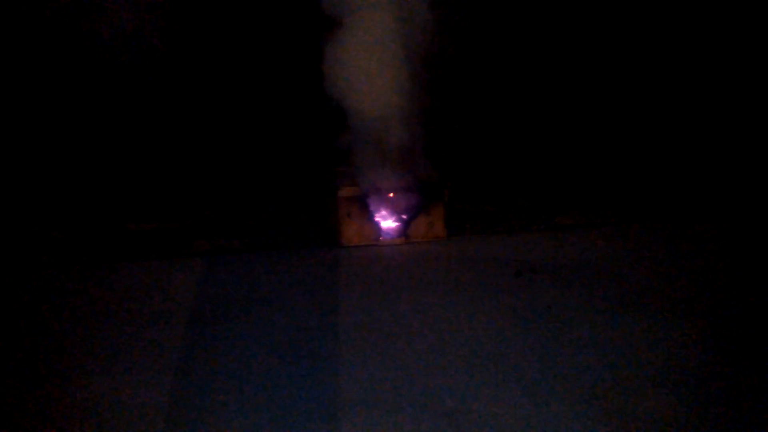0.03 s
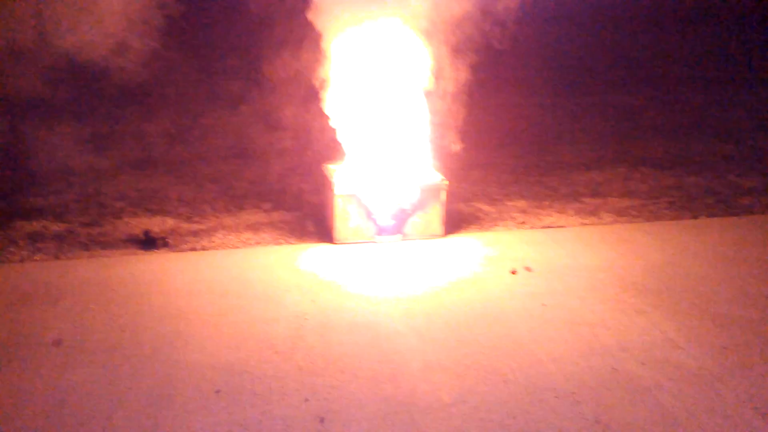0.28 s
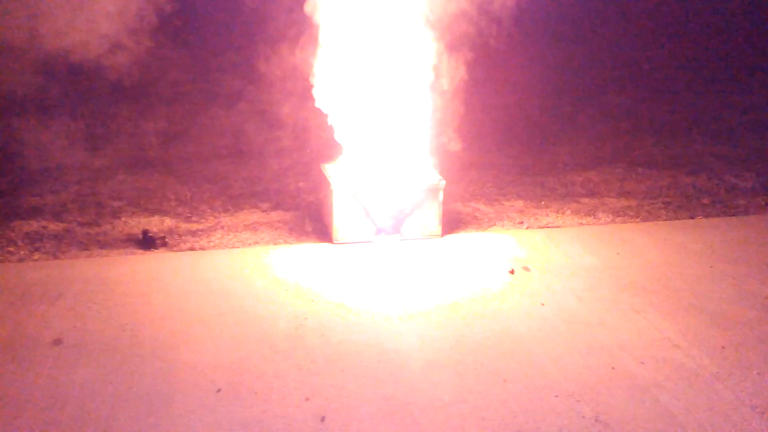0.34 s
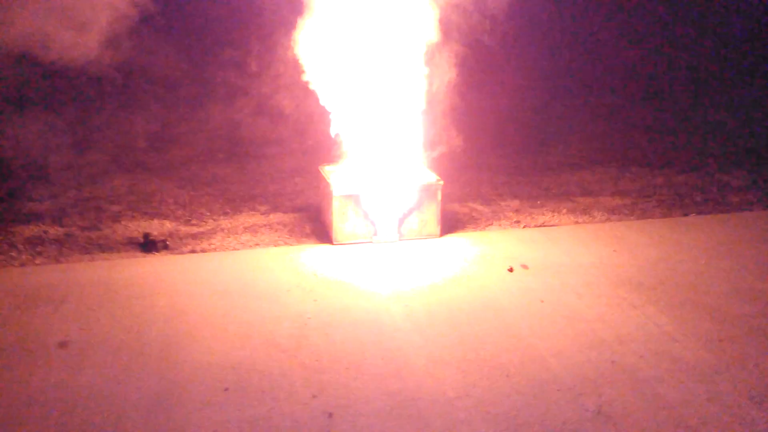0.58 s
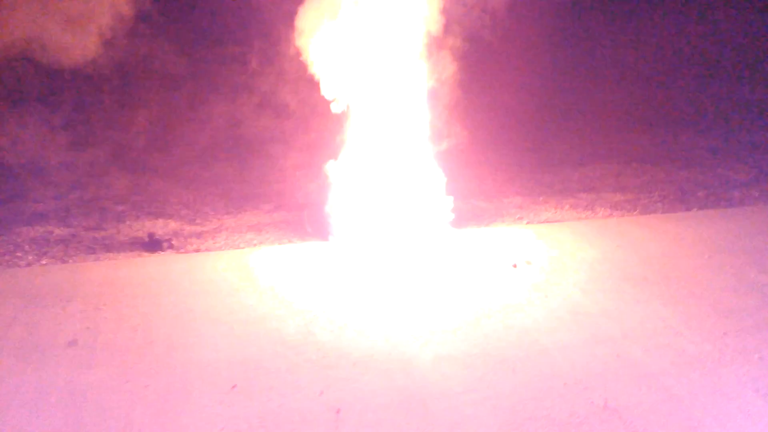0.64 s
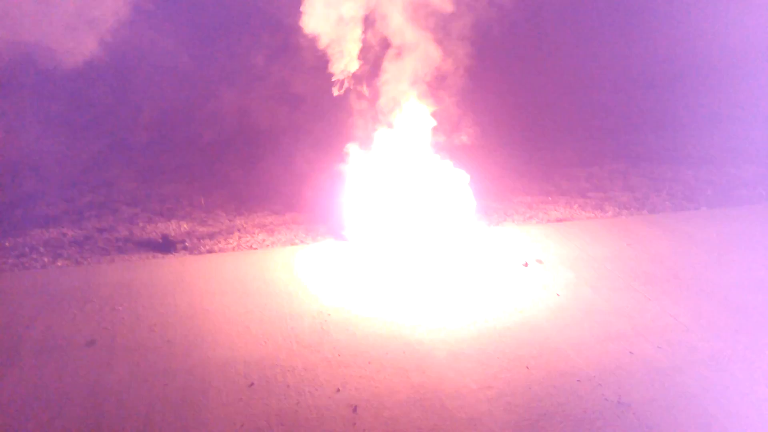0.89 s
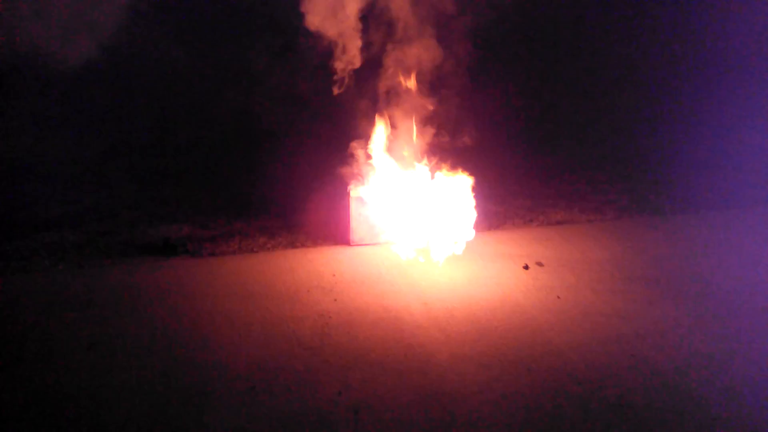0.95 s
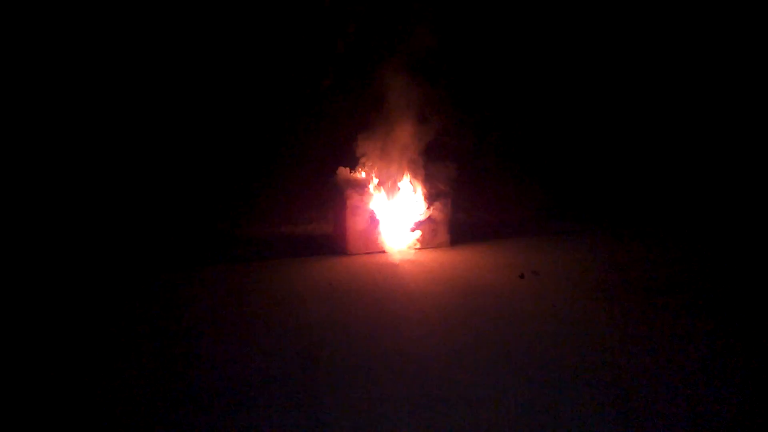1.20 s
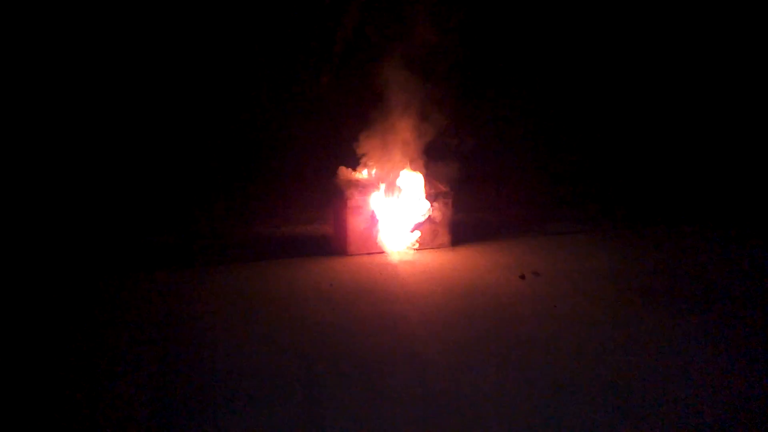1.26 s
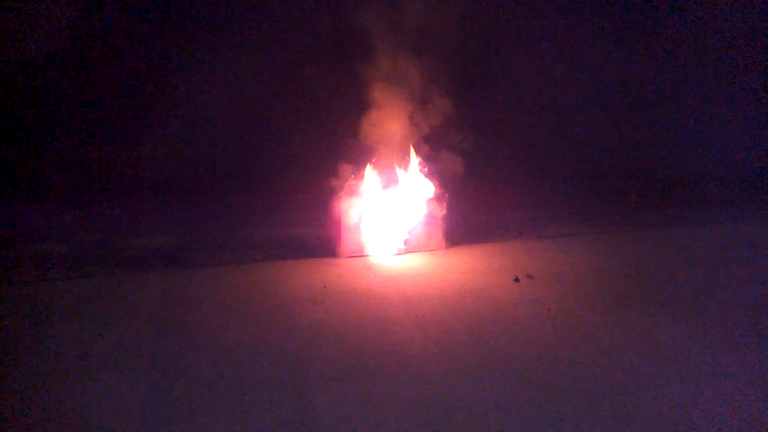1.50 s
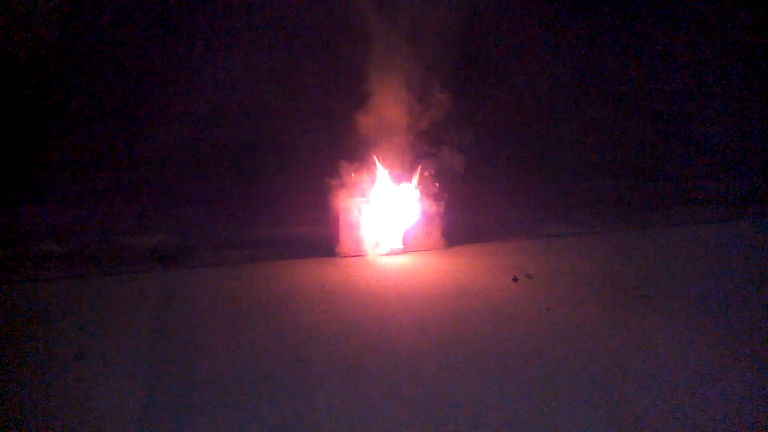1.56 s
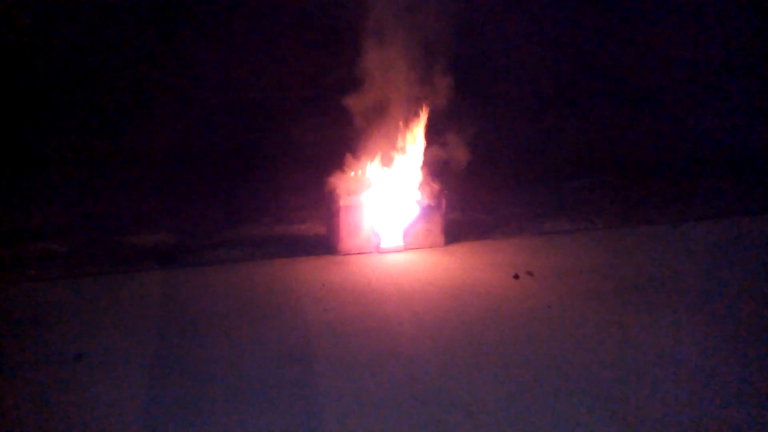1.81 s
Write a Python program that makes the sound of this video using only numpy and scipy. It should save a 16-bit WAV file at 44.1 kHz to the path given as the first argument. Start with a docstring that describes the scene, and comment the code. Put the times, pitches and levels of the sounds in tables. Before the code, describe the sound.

Gas ignites with a fluttering roar and a deep whoomp, leaving a small fire burning.

```python
"""Gas catching in an open box on concrete, outdoors at night, a few metres from a microphone pair.
The igniter fizzes and its sparks snap and knock in the box. A column of flame roars up in surges,
pockets of gas thump, then a fireball whoomps out and makes the air in the box boom.
A small fire, there from the start, is left fluttering over a soft hiss."""
import sys
import numpy as np
from scipy import signal
from scipy.fft import rfft, irfft
from scipy.io import wavfile
from scipy.ndimage import uniform_filter1d

SR = 44100
rng = np.random.default_rng(int(sys.argv[2]) if len(sys.argv) > 2 else 0)


def store_pcm(level_fs):
    """Save levels as 16-bit WAV."""
    pcm = np.round(np.clip(level_fs, -1, 1) * 32767).astype(np.int16)
    wavfile.write(sys.argv[1], SR, np.atleast_2d(pcm).T)


N = 81585
TIME, FREQS = np.arange(N) / SR, np.maximum(np.fft.rfftfreq(N, 1 / SR), 1)


def from_db(db):
    """Decibels to gain."""
    return 10 ** (np.asarray(db) / 20)


def in_time(rows):
    """Each column of a curve at every sample."""
    time_s, *columns = np.transpose(rows)
    return [np.interp(TIME, time_s, column) for column in columns]


def at_hz(points, hz):
    """Reads a table on a log-frequency axis."""
    freq_hz, value = np.transpose(points)
    return np.interp(np.log(hz), np.log(freq_hz), value)


def pan(db):
    """Left and right gains for a level difference."""
    return from_db(np.array([[.5], [-.5]]) * db)


def decay(age, t60):
    """Gain of a ring that falls 60 dB in t60."""
    return from_db(-60 * age / t60)


def drift(rate_hz):
    """Smooth random wander with a spread of 1."""
    slow = irfft(rfft(rng.standard_normal(N)) / (1 + (FREQS / rate_hz) ** 2), N)
    return slow / slow.std()


def turbulence(spectrum_db, likeness, level_db, flutter_db, flutter_hz, flicker_db):
    """Stereo noise in octaves; each follows level_db(hz), a shared flutter and its own flicker."""
    alike = np.clip(at_hz(likeness, FREQS), -.99, .99)
    mid, side = rfft(rng.standard_normal((2, N))) * from_db(spectrum_db) * np.sqrt(SR) / 2
    pair = np.sqrt(1 + alike) * mid + np.sqrt(1 - alike) * side * [[1], [-1]]
    centres_hz = 80 * 2. ** np.arange(8)
    out, flutter = 0, drift(flutter_hz)
    for hz, share in zip(centres_hz, np.eye(len(centres_hz))):
        band = irfft(pair * np.interp(np.log(FREQS), np.log(centres_hz), share), N)
        power = np.mean(band ** 2)
        band *= from_db(flutter_db * flutter * hz / (hz + 200) + flicker_db * drift(32))
        local_power = uniform_filter1d(np.mean(band ** 2, axis=0), size=1800)
        even = np.sqrt(power / (local_power + 1e-20))   # irons out the slower swings
        out = out + band * even * from_db(level_db(hz))
    return out


# Air resonances of the open box: centre_hz, width_hz, lift_db
BOX_MODES = [(86, 11, 1), (176.4, 21.5, 10), (269, 11, 6), (310, 13, 7), (560, 25, 3), (1036, 16, 9.5),
             (1185, 21, 3.5)]

def box_lift_db():
    """Lift that the air in the box gives to each frequency."""
    return sum(db / (1 + (2 * (FREQS - hz) / width) ** 2) for hz, width, db in BOX_MODES)


# Low flames, a few metres off: freq_hz, density_db
FIRE_COLOUR = [(60, -67.5), (110, -71), (200, -73), (420, -79), (620, -85.5), (1000, -92.5), (2000, -101.5),
               (5000, -112)]
# Their rise and fall: time_s, level_db
FIRE_LEVEL = [(0, -9), (.06, -10.5), (.19, -1), (.3, -5), (.9, -0.5), (1.08, -2), (1.16, 0.5), (1.3, -1),
              (1.38, 0.5), (1.6, 0.5), (1.85, 0)]
# Left-right likeness of fire and hiss, locked in a narrow band near 7.3 kHz: freq_hz, correlation
FIRE_STEREO = [(60, -0.88), (160, -0.44), (300, -0.71), (700, -0.067), (1450, 1), (2100, 0.38), (2800, 0.9),
               (3700, -0.087), (6200, 0.49), (6700, 0.06), (7100, 1), (7600, 1), (8000, 0.31), (8700, 0.42),
               (9500, 0.22), (15000, 0.97)]

def small_fire():
    """Low flames flap in the box."""
    db, = in_time(FIRE_LEVEL)
    colour_db = at_hz(FIRE_COLOUR, FREQS) + 0.36 * box_lift_db()
    return pan(db=-3.5) * turbulence(colour_db, FIRE_STEREO, lambda hz: db,
                                     flutter_db=-0.5, flutter_hz=55, flicker_db=3.0)


# Background hiss: freq_hz, density_db
HISS_COLOUR = [(60, -78), (200, -90), (500, -89), (1300, -94.5), (3000, -99), (5000, -101), (7500, -101),
               (10000, -107), (15000, -114)]

def hiss():
    """Steady faint hiss behind everything."""
    return turbulence(at_hz(HISS_COLOUR, FREQS), FIRE_STEREO, lambda hz: 0,
                      flutter_db=-0.5, flutter_hz=200, flicker_db=1.5)


# The igniter's fizz: freq_hz, density_db
IGNITER_COLOUR = [(150, -90), (350, -77.5), (580, -77.5), (900, -87), (1400, -93), (2100, -80.5),
                  (3000, -107), (6000, -100), (9000, -102), (15000, -113)]
# Its brief swell: time_s, level_db
IGNITER_LEVEL = [(0, -20), (.035, -11), (.07, -1.5), (.11, -4), (.17, -8.5), (.21, -19), (.3, -44)]
# Left-right likeness of igniter and flame column: freq_hz, correlation
FLAME_STEREO = [(60, 0.28), (220, 1), (380, .25), (620, 0.92), (1400, 1), (2100, 0.67), (2800, 0.77),
                (7300, 1), (12000, 0.43)]

def igniter():
    """The igniter sputters before the gas catches."""
    db, = in_time(IGNITER_LEVEL)
    return turbulence(at_hz(IGNITER_COLOUR, FREQS), FLAME_STEREO, lambda hz: db,
                      flutter_db=4.5, flutter_hz=180, flicker_db=5)


# Sparks and crackles, a little to the left: start_s, snap_db, knock_db
SPARK_EVENTS = [(.027, -54, -42.5), (.038, -66, -48), (.0535, -45, -51), (.0593, -41.5, -34),
                (.066, -55, -45), (.077, -55, -47), (.088, -40, -44), (0.098, -33, -44.5), (.150, -39, -51),
                (.1585, -37, -43.5), (.383, -35.5, -52), (.576, -45, -67), (.681, -37, -51),
                (.807, -40, -60), (.832, -39.5, -63), (.940, -48, -70), (1.2041, -34.5, -47),
                (1.218, -44, -64), (1.437, -55, -46)]
# The box's answer to each: pitch_hz, level_db, t60_s
KNOCK_MODES = [(573, -5.5, 0.021), (1000, -11, 0.0047), (1800, -15.5, 0.0043), (1950, -3.5, 0.011),
               (2196, -6, 0.0082)]

def sparks():
    """Each spark is a short bright snap and a knock in the box."""
    snaps, knocks = np.zeros(N), np.zeros(N)
    for start_s, snap_db, knock_db in SPARK_EVENTS:
        age = np.maximum(TIME - start_s, 0)
        snaps += from_db(snap_db) * (age > 0) * decay(age, t60=.012) * rng.standard_normal(N) / 2
        for hz, db, t60 in KNOCK_MODES:
            detune = rng.normal(1, 0.052)
            knocks += from_db(knock_db + db) * decay(age, t60) * np.sin(2 * np.pi * hz * detune * age)
    treble = signal.butter(1, [4700, 11000], "band", fs=SR, output="sos")
    return pan(db=3) * (knocks + signal.sosfilt(treble, snaps))


# The flame standing over the box: freq_hz, density_db
COLUMN_COLOUR = [(40, -67), (60, -65), (120, -63.5), (250, -66.5), (390, -75.5), (600, -75), (780, -79.5),
                 (1000, -78.5), (1500, -89.5), (2200, -88.5), (3200, -96), (5000, -103), (6800, -100),
                 (10000, -112), (15000, -120)]
# Its surges: time_s, rumble_db, rush_db
COLUMN_SURGES = [(.202, -25, -33), (.211, 7, 0), (.222, -7, -0.5), (.24, 0, 1), (.275, 3.5, 7),
                 (.315, -1, -2), (.354, 0, -1), (.386, 1.5, 5), (.45, 1, 3.5), (.478, -9, -6.5),
                 (.52, 2, -1), (.64, 0.5, 0.5), (.70, 3.5, 2), (.78, -1, -6), (.9, -36, -30)]

def flame_column(rumble_below_hz=215, rush_above_hz=545):
    """The rising flame: a rumble, with a fluttering rush on top in each surge."""
    rumble, rush = in_time(COLUMN_SURGES)
    def level_db(hz):
        return rumble + (rush - rumble) * at_hz([(rumble_below_hz, 0), (rush_above_hz, 1)], hz)
    colour_db = at_hz(COLUMN_COLOUR, FREQS) + 0.12 * box_lift_db()
    return turbulence(colour_db, FLAME_STEREO, level_db, flutter_db=1.5, flutter_hz=80, flicker_db=1.6)


# Pockets of gas flaring up, straight ahead: peak_s, level_db, cutoff_hz
GAS_POCKETS = [(0.222, -43, 705), (0.27, -35, 1200), (0.382, -36.5, 404), (0.445, -36, 900),
               (1.185, -44, 160)]

def puffs(half_width_s=0.0077, low_cut_hz=142):
    """Each pocket of gas gives one short dull thump in the colour of the flame."""
    out = np.zeros(N)
    for peak_s, db, cutoff_hz in GAS_POCKETS:
        swell = np.exp(-((TIME - peak_s) / half_width_s) ** 2)
        band_loss = np.sqrt((1 + (FREQS / cutoff_hz) ** 4) * (1 + (low_cut_hz / FREQS) ** 8))
        colour = from_db(at_hz(COLUMN_COLOUR, FREQS)) / band_loss
        thump = swell * irfft(rfft(rng.standard_normal(N)) * colour, N)
        out += from_db(db) * thump * np.sqrt(np.sum(swell ** 2) / np.sum(thump ** 2))
    return out


# The whoomp from a few metres: freq_hz, density_db
FIREBALL_COLOUR = [(40, -55), (72, -43), (120, -49.5), (170, -48), (260, -54.5), (360, -55), (530, -53),
                   (780, -62.5), (1100, -64.5), (1650, -73), (2400, -72), (3300, -82.5), (4600, -85),
                   (6200, -82.5), (8200, -94.5), (10500, -108), (15000, -118)]
# Its tail in the open air: freq_hz, t60_s
FIREBALL_TAIL = [(70, 0.51), (180, 0.59), (350, .42), (700, 0.24), (2000, 0.27), (7000, 0.17)]
# Its left-right likeness: freq_hz, correlation
FIREBALL_STEREO = [(60, .75), (220, 0.97), (350, 0.64), (620, 0.95), (1400, 1), (2100, 1), (3000, 0.75),
                   (10000, 1)]

def fireball(peak_s=.730, burn_s=0.057, swell_db_per_s=1000, sag_db_per_s=118):
    """The gas cloud burns all at once and drops to a tail; the bass comes later and lasts longer."""
    def level_db(hz):
        bass_lag_s = 0.0042 / (1 + (hz / 230) ** 2)
        age = TIME - peak_s - bass_lag_s
        spent_s = np.maximum(age - burn_s, 0)
        burn_db = swell_db_per_s * np.minimum(age, 0) - sag_db_per_s * np.clip(age, 0, burn_s)
        drop_db = -4.5 * np.minimum(spent_s / 0.025, 1)   # sudden fall as the gas runs out
        tail_db = -60 * spent_s / at_hz(FIREBALL_TAIL, hz)
        return burn_db + drop_db + tail_db
    colour_db = at_hz(FIREBALL_COLOUR, FREQS) + box_lift_db()
    return pan(db=-1.0) * turbulence(colour_db, FIREBALL_STEREO, level_db,
                                     flutter_db=1.0, flutter_hz=110, flicker_db=1.75)


def scene():
    """Sparks, flame column, fireball and the fire that stays."""
    return igniter() + sparks() + flame_column() + puffs() + fireball() + small_fire() + hiss()


# Phase between left and right, with a narrow opposed band near 7.3 kHz: freq_hz, left_lead_rad
CHANNEL_PHASE = [(1000, 0), (1950, -0.6), (2150, 2), (3550, 2), (3800, -0.8), (4950, -2.1), (5200, 1.1),
                 (6300, 0), (7050, -3.5), (7650, -2.5), (8400, -6.2), (9300, -8), (10000, -10),
                 (11200, -11), (12200, -19), (13100, -15.5), (13800, -18), (14500, -21.9), (15500, -22.5)]
# Balance of the microphone pair: freq_hz, left_minus_right_db
MIC_BALANCE = [(200, 0.5), (340, 1), (560, -0.5), (800, -1), (1500, 0), (2050, -4), (2600, 0), (4400, 0.5),
               (5000, -0.5), (5800, 0)]

def record(dry):
    """The left and right channels differ in phase and level; the deep bass and the top are cut."""
    balance = pan(at_hz(MIC_BALANCE, FREQS))
    balance /= np.sqrt(np.mean(balance ** 2, axis=0))
    right_lag = np.exp(1j * at_hz(CHANNEL_PHASE, FREQS) * np.array([[0], [-1]]))
    heard = irfft(rfft(dry) * balance * right_lag, N)
    low_cut = signal.butter(6, 47.2, "high", fs=SR, output="sos")
    high_cut = signal.ellip(10, .1, 80, 15450, fs=SR, output="sos")
    return signal.sosfilt(high_cut, signal.sosfilt(low_cut, heard))


dry = scene()
out = record(dry)
store_pcm(out)
```